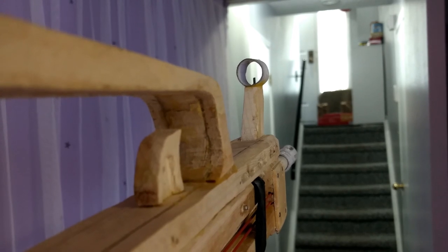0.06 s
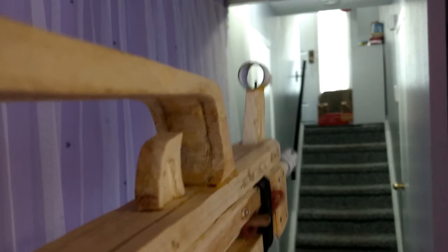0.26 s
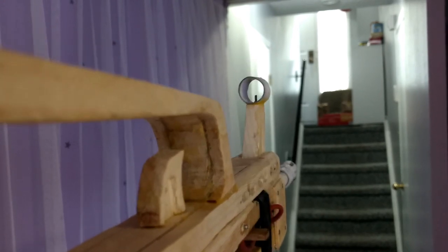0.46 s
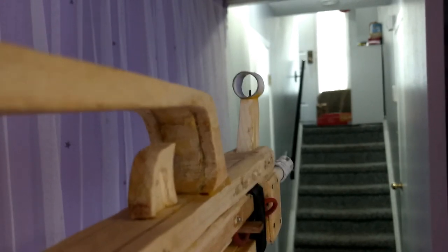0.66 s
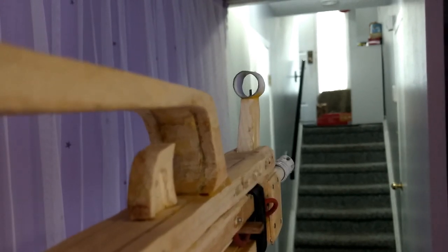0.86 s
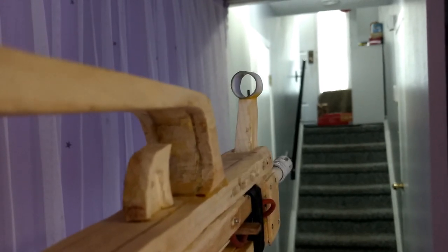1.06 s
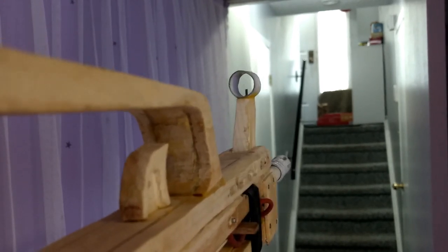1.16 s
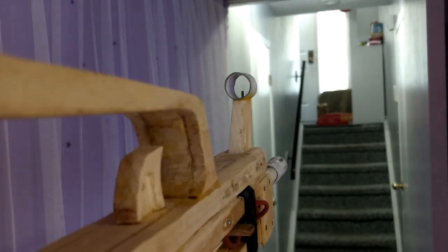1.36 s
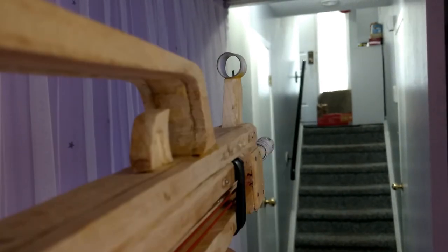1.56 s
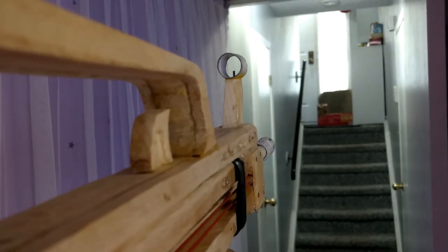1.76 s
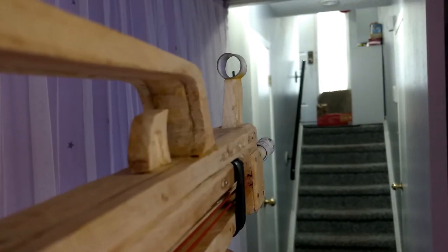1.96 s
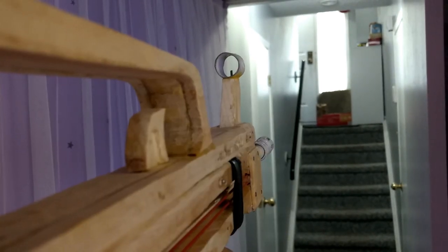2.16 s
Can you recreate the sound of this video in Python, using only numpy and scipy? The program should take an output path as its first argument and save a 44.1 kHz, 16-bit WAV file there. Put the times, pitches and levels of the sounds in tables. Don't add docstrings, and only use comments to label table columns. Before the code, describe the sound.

One slingshot shot in a quiet house hallway, heard on a cheap, buzzing camera microphone; a hard crack, a duller boxy hit, short stairwell echo, light ricochet, muffled pellet bounces on carpet, then clicks from the stock.

```python
import sys
import numpy as np
from scipy import signal
from scipy.fft import rfft, irfft
from scipy.io import wavfile
from scipy.ndimage import uniform_filter1d

SR = 44100
rng = np.random.default_rng(int(sys.argv[2]) if len(sys.argv) > 2 else 0)


def store_wav(level_fs):
    pcm = np.round(np.clip(np.atleast_2d(level_fs), -1, 1) * 32767)
    wavfile.write(sys.argv[1], SR, pcm.T.astype(np.int16))


def undo_db(level):
    steps = np.asarray(level, float) / 20
    return 10 ** steps


N = 97020
TIME = np.arange(N) / SR

# frequency in Hz, level in dB.
WALL_TONE = [(120, -9.5), (250, 10.5), (1000, 1), (2000, -2), (3600, 4), (8000, -5.5), (12000, -15.5),
             (16000, -16.5)]


def evened(x):
    return x / np.sqrt(np.mean(x ** 2) + 1e-20)


def add(mix, start, sound):
    part = mix[round(start * SR):][:len(sound)]
    part += sound[:len(part)]


def late(x, samples):
    turn = np.exp(-2j * np.pi * np.fft.rfftfreq(N) * samples)
    return irfft(rfft(x) * turn, N)


def tinted(x, tone):
    hz, db = np.transpose(tone)
    f = np.fft.rfftfreq(x.shape[-1], 1 / SR)
    gain = undo_db(np.interp(np.log(f + 1), np.log(hz), db))
    return irfft(rfft(x) * gain, x.shape[-1])


def burst(tone, length):
    shape = np.exp(-(np.arange(1024) / SR / length) ** 4)
    x = rng.standard_normal(len(shape)) * shape
    for _ in range(8):
        flat = irfft(np.exp(1j * np.angle(rfft(x))))
        x = flat * shape
    x = tinted(x, tone) * shape ** 0.3
    return x * np.linalg.norm(shape) / np.linalg.norm(x)


def ring(modes):
    t = np.arange(SR // 8) / SR
    attack = np.minimum(t / 0.0008, 1)
    return attack * sum(undo_db(db - 60 * t / t60) * np.sin(2 * np.pi * hz * t) for hz, db, t60 in modes)


def hall(x, wet_db, t60, damp):
    shared = 0.23
    size = SR // 2
    taps = np.zeros((2, size))
    at = np.arange(120, size - 10, 10) + rng.integers(0, 10, (2, (size - 121) // 10))
    np.put_along_axis(taps, at, rng.standard_normal(at.shape), 1)
    hz, t, echoes = signal.stft(taps, SR, nperseg=256)
    decay = undo_db(-60 * t / t60 * (1 + damp * hz[:, None] / 1000))
    tail = signal.istft(echoes * decay, SR, nperseg=256)[1]
    tail = tail / np.linalg.norm(tail[0])
    wet = undo_db(wet_db) * signal.fftconvolve(x[None], tail, axes=1)[:, :N]
    return np.array([x + wet[0], x + shared * wet[0] + np.sqrt(1 - shared ** 2) * wet[1]])


def camera_gain_db():
    # time in seconds, gain in dB.
    gain = [(0, 5), (.237, 5), (.28, -8), (.34, -18), (.46, -22), (.66, -8), (.84, -5.5), (1.44, -6.5),
            (1.47, 0), (2.2, 0)]
    return np.interp(TIME, *np.transpose(gain))


def camera_floor():
    # frequency in Hz, level in dB per Hz.
    front_hiss = [(40, -38.5), (80, -14.5), (140, -11), (300, -12), (700, -18.5), (1500, -22.5),
                  (4000, -23.5), (15000, -32.5)]
    # frequency in Hz, level in dB.
    rear_hiss = [(40, -18.5), (80, -0.5), (140, 3), (300, -7), (700, -18), (1500, -24), (2800, -30.5),
                 (8000, -42)]
    pictures_per_s, buzz_start_s, buzz_db = 29.9, 0.008, -35.5
    lumps_per_s, lump_db = 420, -51.5
    pulse_hz = 220

    floor = np.array([undo_db(db) * evened(tinted(rng.standard_normal(N), tone))
                      for db, tone in [(-48, front_hiss), (-39.5, rear_hiss)]])

    u = np.arange(-400, 400) / SR
    pulse = np.cos(2 * np.pi * pulse_hz * u) * np.exp(-(u * pulse_hz * 2.2) ** 2)
    beat = np.diff(np.floor((TIME - buzz_start_s) * pictures_per_s), prepend=-1)
    beat = beat * undo_db(buzz_db + 2.5 * rng.standard_normal(N))
    lumps = (rng.random(N) < lumps_per_s / SR) * rng.standard_normal(N) * undo_db(lump_db)
    floor[1] += signal.oaconvolve(lumps + beat, pulse, "same")
    return floor * undo_db(camera_gain_db() * np.array([[1], [1.45]]))


def stock_ticks():
    # start in seconds, level in dB, pitch in Hz.
    tick_events = [
        (0.089, -52, 2384),
        (1.5921, -20.5, 2216),
        (1.593, -42, 1470),
        (1.609, -32, 2530),
        (1.61, -31, 1620),
        (2.17, -36.5, 950),
    ]
    t60 = 0.0079
    x = np.zeros(N)
    for start, db, hz in tick_events:
        tick = ring([(hz, db, t60), (hz * 1.2, db - 9, t60)])
        soft_start = np.minimum(np.arange(len(tick)) / SR / 0.00091, 1)
        add(x, start, tick * soft_start * 1.39)
    return hall(x, wet_db=-11.5, t60=0.076, damp=0.058)


def step_drops():
    # start in seconds, level in dB.
    drops = [
        (1.0881, -36.5),
        (1.098, -27.5),
        (1.181, -38),
        (1.211, -45),
        (1.282, -54),
    ]
    # frequency in Hz, level in dB, T60 in seconds.
    step_modes = [(234, -3.5, 0.014), (316, 2.5, 0.016), (478, -0.5, 0.027), (611, -38, 0.013),
                  (727, -6, 0.03), (1030, -24, 0.0061)]
    x = np.zeros(N)
    for start, db in drops:
        add(x, start, undo_db(db - 6) * ring(step_modes))
    return hall(x, wet_db=0, t60=0.226, damp=0.15)


def wall_rebounds():
    # start in seconds, level in dB.
    rebounds = [
        (0.684, -48),
        (0.7007, -35),
        (0.717, -32.5),
    ]
    x = np.zeros(N)
    for start, db in rebounds:
        add(x, start, undo_db(db) * burst(WALL_TONE, 0.003))
    return hall(x, wet_db=8.5, t60=0.32, damp=0.0059)


def box_knocks():
    # start in seconds, level in dB.
    knocks = [
        (0.4703, -10.5),
        (.4728, -7.5),
        (.4815, -17),
        (0.4926, -16.5),
        (.514, -16.5),
        (.528, -25),
    ]
    # frequency in Hz, level in dB, T60 in seconds.
    box_modes = [(258, -21, 0.017), (355, 2, 0.025), (512, -2, 0.031), (793, 11.5, 0.012),
                 (1067, -25.5, 0.0126), (1836, 8, 0.0067), (1990, 8, .008), (2620, -32.5, .008),
                 (4400, -1, 0.0065), (6370, -3, 0.0045), (7500, -43.5, 0.0032)]
    x = np.zeros(N)
    for start, db in knocks:
        add(x, start, -undo_db(db - 8) * ring(box_modes))
        add(x, start, undo_db(db - 9.5) * burst(WALL_TONE, 0.003))
    return hall(x, wet_db=-1, t60=0.27, damp=0.015)


def body_thump():
    hz, db = 168, -4.5
    x = np.zeros(N)
    add(x, 0.24, ring([(hz, db, 0.016), (hz * 1.4, db - 15.5, 0.06)]))
    return x


def rifle():
    # start in seconds, level in dB, burst length in seconds.
    snaps = [
        (0.238, 2.5, 0.0042),
        (0.2638, -16, .003),
    ]
    # frequency in Hz, level in dB.
    snap_tone = [(200, -24.5), (600, -5), (1600, -1), (2500, -3.5), (4600, 3.5), (8000, -4.5), (12000, -11),
                 (16000, -15.5)]
    slip_start_s, slip_s, slip_db, slip_rise_db, grains_per_s = 0.221, 0.0165, -28, 16, 4000
    whip_s, whip_db = 0.025, -24

    x = np.zeros(N)
    for start, db, length in snaps:
        add(x, start, undo_db(db) * burst(snap_tone, length))

    grains = rng.random(N) < grains_per_s / SR
    grit = rng.standard_normal(N) * (0.25 + grains * 1.2)
    slip = evened(tinted(grit, [(100, -21), (1500, -8), (3000, 2), (7000, -6.5), (10000, -18)]))
    u = (TIME - slip_start_s) / slip_s
    swell = undo_db(slip_db + slip_rise_db * (np.clip(u, 0, 1) - 0.5))
    x += slip * swell * (u > 0) * (u < 1)

    w = (TIME - snaps[0][0]) / whip_s
    x += undo_db(whip_db) * evened(tinted(grit[::-1], snap_tone)) * (w > 0) * (w < 1)

    thin = tinted(x, [(1200, -7), (3200, -2), (16000, 2.5)])
    return x - thin + hall(thin, wet_db=-17.5, t60=0.26, damp=0.03)


def ports(front, rear):
    port_lag, left_lag = 21.1, 3.6
    left = late(rear - late(front, port_lag), left_lag)
    right = front - late(rear, port_lag)
    return np.array([left, right])


def scene():
    # frequency in Hz, level in dB.
    rear_far = [(100, 6), (1000, -2.5), (1600, -0.5), (2600, -2.5), (4000, -40), (12000, -28.5)]
    rear_near = [(100, -2.5), (1900, 2), (2600, -9.5), (4000, -29.5), (12000, -24)]
    front_near = [(100, -13), (1200, -13.5), (1900, 7), (2600, 2.5), (12000, 4)]
    floor = camera_floor()
    far = step_drops() + wall_rebounds() + box_knocks()
    near = stock_ticks() + rifle()
    front = far[0] + tinted(near[0], front_near) + floor[0]
    rear = tinted(far[1], rear_far) + tinted(near[1], rear_near) + floor[1] - body_thump()
    return ports(front, rear)


def noise_gate(x):
    threshold_db, slope, depth_db, window_s = -47, 6, 12, 0.002
    power = (x ** 2).mean(0)
    power_db = 10 * np.log10(abs(uniform_filter1d(power, round(window_s * SR))) + 1e-12)
    held_db = 10 * np.log10(abs(uniform_filter1d(power, 2600, origin=600)) + 1e-12)
    ducked_db = np.minimum(camera_gain_db() + 6, 0)
    cut_db = np.clip((threshold_db + ducked_db - power_db) * slope, 0, depth_db)
    cut_db *= np.clip((threshold_db + 3 - held_db) / 1.5, 0, 1)
    return x / undo_db(uniform_filter1d(cut_db, 40))


def roll_off(x):
    return signal.sosfilt(signal.butter(12, 15980, fs=SR, output="sos"), x)


def record(dry):
    gated = noise_gate(dry)
    low_cut = signal.butter(2, 26, "high", fs=SR, output="sos")
    gated = signal.sosfilt(low_cut, gated)
    treble_edge = signal.firwin(255, 15900, window=("kaiser", 7), fs=SR)[None]
    mix = np.clip(signal.oaconvolve(gated, treble_edge, "same"), -1, 1)
    return roll_off(mix)


dry = scene()
out = record(dry)
store_wav(out)
```